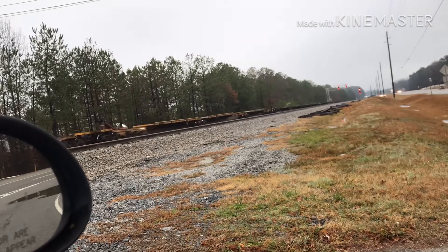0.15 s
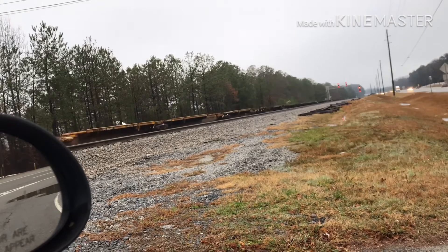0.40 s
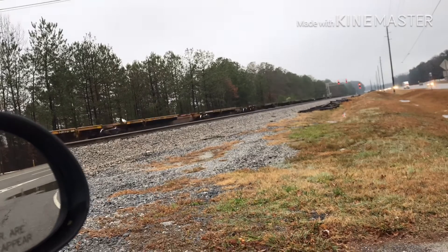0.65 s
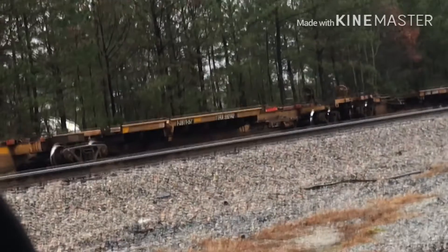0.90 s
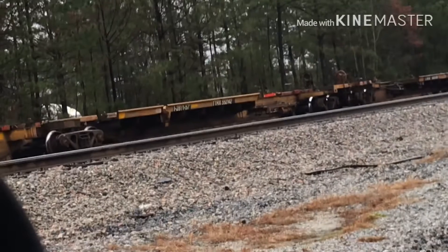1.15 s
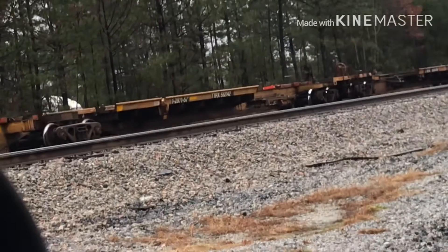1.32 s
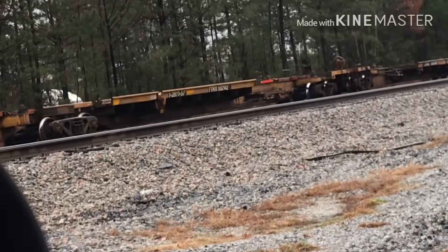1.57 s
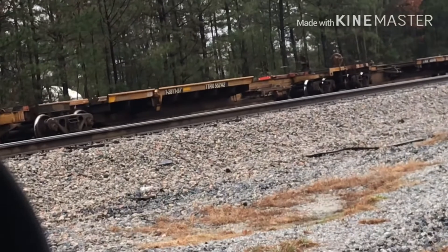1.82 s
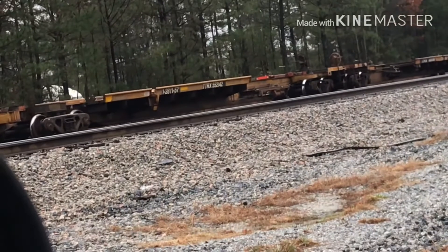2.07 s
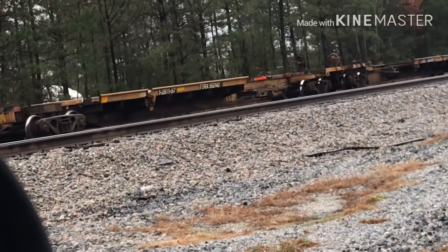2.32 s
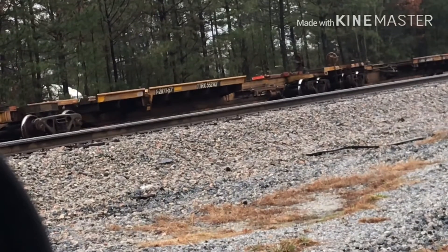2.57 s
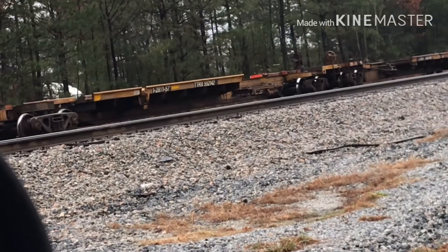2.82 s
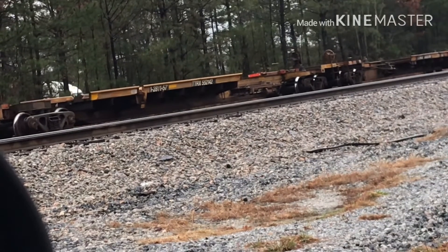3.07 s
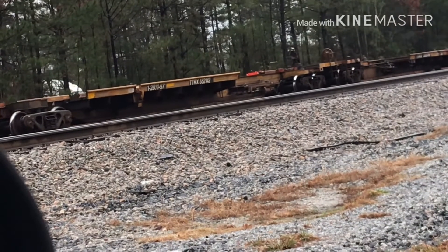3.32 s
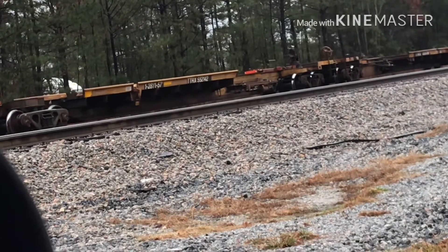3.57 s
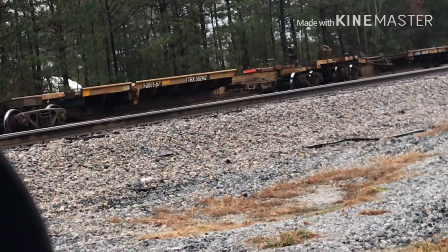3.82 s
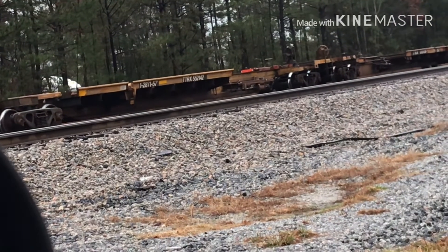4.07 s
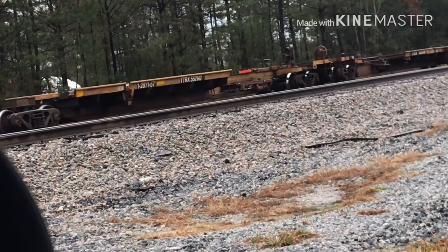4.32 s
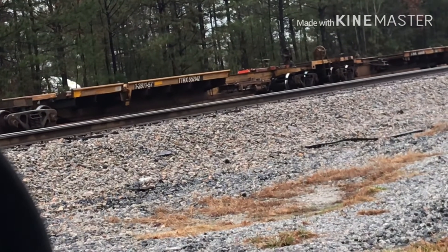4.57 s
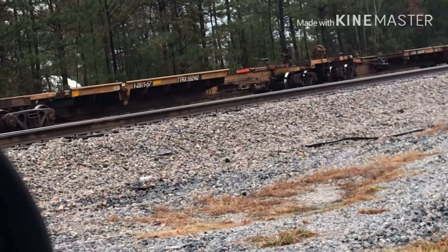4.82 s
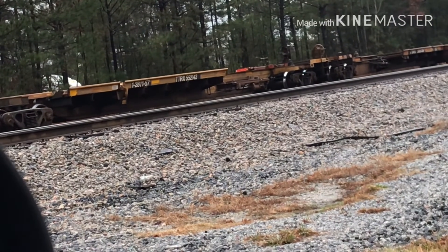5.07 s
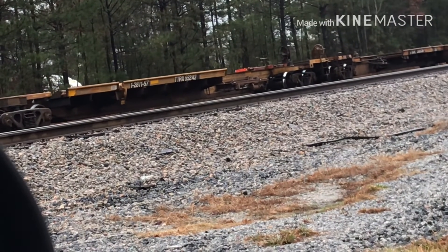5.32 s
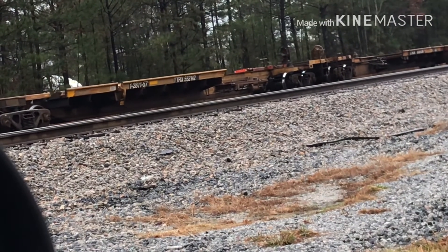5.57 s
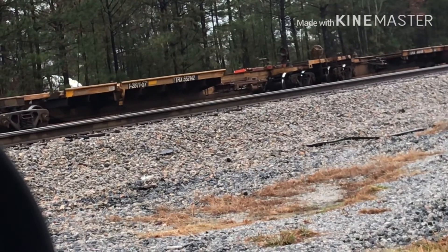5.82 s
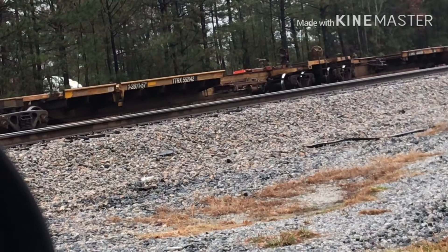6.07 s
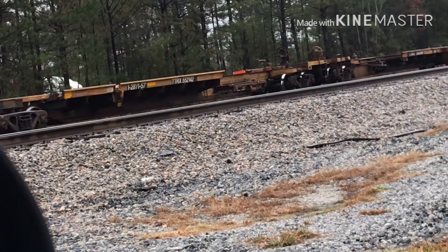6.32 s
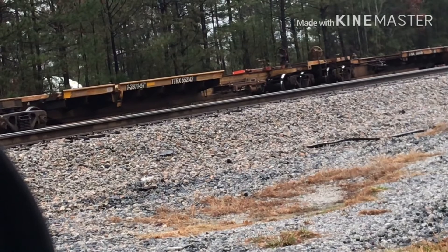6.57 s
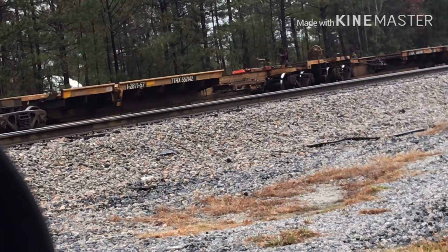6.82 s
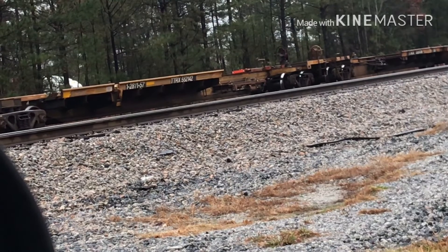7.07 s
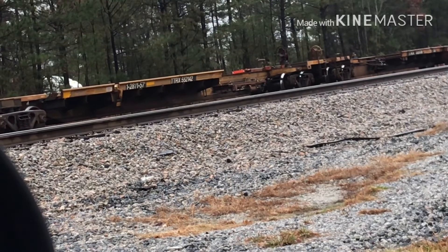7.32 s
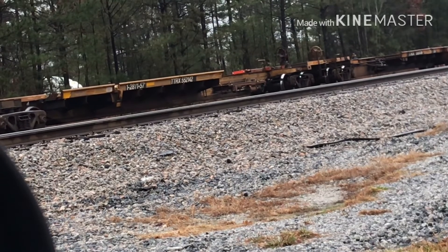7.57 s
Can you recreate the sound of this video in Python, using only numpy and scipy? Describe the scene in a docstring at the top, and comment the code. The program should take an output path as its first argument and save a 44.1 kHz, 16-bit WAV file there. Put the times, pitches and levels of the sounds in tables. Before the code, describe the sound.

After a short silence, wet-road traffic swells past a parked car over a slow, low engine throb, with one brief hollow creak.

```python
"""After a short silence, wet-road traffic swells in over a slow, low engine throb.
It is heard beside a railway line, from the open window of a parked car.
Traffic passes in swells: filtered noise makes rumble, tyre roar and spray; noise on gliding
pitches makes tyre singing; gliding sines make driveline hums; multiples of a firing rate make the throb.
Once something hollow creaks right by the microphone: stick-slip pulses ring a small body."""
import sys
import numpy as np
from scipy import signal
from scipy.fft import rfft, irfft, next_fast_len
from scipy.io import wavfile

SR = 44100
rng = np.random.default_rng(int(sys.argv[2]) if len(sys.argv) > 2 else 0)


def generate_wav(signal):
    """Clip the signal to [-1, 1] and save it as 16-bit WAV at the path in sys.argv[1]."""
    frames = np.transpose(np.atleast_2d(signal))
    scaled = np.clip(frames, -1, 1) * 32767
    pcm = np.round(scaled).astype(np.int16)
    wavfile.write(sys.argv[1], SR, pcm)


def rack_gain(trim_db):
    """Turn a fader trim in dB into the linear factor to multiply a signal by."""
    fader = np.asarray(trim_db, float)
    return 10 ** (fader / 20)


N = 337806   # length in samples


def rms_one(x):
    """Scales a signal to an rms of 1."""
    return x / np.sqrt(np.mean(x ** 2) + 1e-20)


def in_time(rows):
    """Draws straight lines through the table columns over time; the first column is t/s."""
    s, *columns = np.transpose(rows)
    return [np.interp(np.arange(N) / SR, s, c) for c in columns]


def at_hz(points, hz):
    """Reads a spectrum in dB along log frequency; beyond its ends it falls to -90 dB."""
    point_hz, point_db = np.transpose(points)
    return np.interp(np.log(hz), np.log(point_hz), point_db, left=-90, right=-90)


def drift(rate_hz):
    """Slow chance of spread 1: noise at every 40th sample through a double one-pole low-pass."""
    r = np.exp(-80 * np.pi * rate_hz / SR)
    noise = rng.standard_normal(N // 40 + 2002)
    slow = signal.lfilter([1], [1, -2 * r, r * r], noise)[2000:]   # the filter has settled by then
    return np.interp(np.arange(N) / 40, np.arange(len(slow)), rms_one(slow))


def resonance(x, hz, width_hz):
    """A two-pole resonance with a gain of about 1 at its peak."""
    r = np.exp(-np.pi * width_hz / SR)
    feedback = [1, -2 * r * np.cos(2 * np.pi * hz / SR), r * r]
    return signal.lfilter([(1 - r * r) / 2, 0, (r * r - 1) / 2], feedback, x)


# puddles hit by tyres: t/s, rise of mist level/dB, length/s between the 1/e points of the rise
PUDDLES = [(3.132, 3, 0.017), (4.8, 2, 0.03), (4.97, 3, 0.03), (5.058, 5, 0.037), (6.35, 6.5, 0.027),
           (6.418, 5.5, 0.055), (6.568, 4, 0.029), (6.98, 5, 0.039), (7.1, 4.5, 0.056), (7.228, 7.5, 0.042)]


def splash_rise_db():
    """Each puddle throws up a brief bell-shaped rise in level."""
    t = np.arange(N) / SR
    return sum(rise_db * np.exp(-((t - s) / (length_s / 2)) ** 2) for s, rise_db, length_s in PUDDLES)


# swells of passing traffic, one pass may take several rows: comes into view t/s, hidden by the car body
# t/s, tyre roar level/dB, rise while nearing/(dB/s) at steepness 1, body, spray and mist level/dB
# against the roar (each part takes its share), time constant of slipping out of view/s
TRAFFIC_SWELLS = [(0.732, 0.786, -30.5, 104, -6.5, 3, -3, 0.096),
                  (0.952, 1.378, -35.5, 21, 5.5, -4.5, -19.5, 0.098),
                  (3.163, 3.6, -55, 53, -14.5, -4, -38, .4),
                  (4.06, 4.195, -38.5, 9.5, -13.5, -10.5, -32, 0.33),
                  (4.53, 5.016, -33.5, 32, -3, -15, -25.5, 0.081),
                  (6.396, 6.76, -45, 40, -4, -3.5, -17, .15),
                  (6.903, 7.384, -39.5, 15, 1.5, -4.5, -23.5, 0.25),
                  (7.66, 7.996, -31.5, 6, -2.5, -12.5, -30, 0.11)]
# rows rumble, drone, roar, swish, spray, mist, haze: level/dB against roar, share of body, of spray,
# of mist, steepness of nearing, loss when hidden/dB, loss while leaving/(dB/s), far traffic level/dB
PART_MIX = [(-0.5, 1, 0.013, 0.17, 0.43, -1, 7, -44), (0.1, 0.98, 0.00049, 0.025, 0.74, 9.5, 6, -65),
            (-1.5, -0.5, 0.12, 0, 1.056, 7.5, 10.5, -50), (-4.5, -0.63, 0.66, 0.07, 2, 16.5, 8.5, -58.5),
            (0, -0.23, 0.99, 0.018, 1.63, 13.5, 19.5, -57.5),
            (0, 0.047, 0.021, 0.94, 1.37, 18, 19.5, -77.5), (-6.5, 0.048, 0, 1.47, 1.9, 12.5, 28.5, -91.5)]


def part_powers():
    """Each swell of passing traffic rises, sags in view, drops when hidden and fades; powers add."""
    t = np.arange(N) / SR
    sag_db_per_s = 5   # slow loss while in view, at steepness 1
    (offset_db, body_share, spray_share, mist_share,
     steep, hidden_db, leave_db, far_db) = np.transpose(PART_MIX)[:, :, None]
    powers = rack_gain(2 * far_db) * np.ones(N)
    for seen, hidden, roar_db, rise_db, body_db, spray_db, mist_db, hiding_s in TRAFFIC_SWELLS:
        early, late = np.maximum(seen - t, 0), np.maximum(t - hidden, 0)
        in_view = np.clip(t - seen, 0, hidden - seen)
        loss_db = steep * (rise_db * early + sag_db_per_s * in_view)
        loss_db = loss_db + hidden_db * (1 - np.exp(-(late / hiding_s) ** 2)) + leave_db * late
        colour_db = offset_db + body_share * body_db + spray_share * spray_db + mist_share * mist_db
        powers += rack_gain(2 * (roar_db + colour_db - loss_db))
    splash_db = splash_rise_db()
    for part, share in [(3, 0.25), (4, 0.91), (5, 1)]:   # swish, spray, mist
        powers[part] *= rack_gain(2 * share * splash_db)
    return powers


# noise colours of the traffic parts, low to high: f/Hz, relative level/dB per Hz
RUMBLE_COLOUR = [(35, -44), (50, -9.5), (120, -2), (300, -2.5), (450, -8.5), (800, -18)]
DRONE_COLOUR = [(250, -32), (420, -3.5), (650, -5.5), (950, -6), (1500, -6)]
ROAR_COLOUR = [(600, -16.5), (1000, 2), (1600, -0.5), (2400, -6), (3500, -17.5), (5000, -48)]
SWISH_COLOUR = [(1800, -14), (2700, 1), (3300, -2), (4200, -2.5), (5200, -36)]
SPRAY_COLOUR = [(3500, -4.5), (4600, -2), (6000, 2), (6900, -4), (7600, -14.5), (9500, -36)]
MIST_COLOUR = [(5500, -9.5), (7500, -1), (9300, -14), (11000, -15), (14500, -28), (17000, -37.5)]
HAZE_COLOUR = [(9500, -25), (11000, -5), (14500, -2), (17000, -5)]


def traffic(shared_db=0.62, patchy_db=0.93, slow_db=1.3):
    """Narrow noise bands; in each the powers of all parts add, and the sum flickers."""
    size = next_fast_len(N)
    hz = np.maximum(np.arange(size // 2 + 1) * SR / size, 1)
    colours = [RUMBLE_COLOUR, DRONE_COLOUR, ROAR_COLOUR, SWISH_COLOUR,
               SPRAY_COLOUR, MIST_COLOUR, HAZE_COLOUR]
    totals = [np.sum(rack_gain(at_hz(c, hz)) ** 2) for c in colours]   # for power 1 per part
    powers = part_powers()
    white = rfft(rng.standard_normal(size)) * np.sqrt(size / 2)   # power 1 per frequency bin
    out, together = np.zeros(N), drift(16.0)
    for centre in 2 ** np.arange(5, 14.1, 1 / 6):   # f/Hz, a sixth of an octave apart
        steps = np.clip(np.log2(hz / centre) * 6, -1, 1)
        overlap = np.cos(np.pi / 2 * steps) ** 2   # neighbouring bands sum to 1
        band = irfft(white * overlap, size)[:N]
        shares = np.array([rack_gain(2 * at_hz(c, centre)) for c in colours]) / totals
        flicker_db = shared_db * together + patchy_db * drift(8.7) + slow_db * drift(1.84)
        out += band * np.sqrt(shares @ powers) * rack_gain(flicker_db)
    return out


# echo off the road beside the direct sound: t/s, lag/ms, strength (0-1)
ROAD_REFLECTION = [(.63, 0.55, 0.41), (1.5, 0.57, 0.06), (3.2, 0.46, 0.12), (3.8, 0.5, 0.44),
                   (4.5, 0.58, 0.4), (5.3, 0.59, 0.01), (7.66, 0.56, 0.33)]


def road_echo(x, dull_hz=3600):
    """A late, duller copy combs the sound; its dips glide as the vehicle moves."""
    lag_ms, strength = in_time(ROAD_REFLECTION)
    dull = signal.sosfiltfilt(signal.butter(2, dull_hz, fs=SR, output="sos"), x)
    late = np.interp(np.arange(N) - lag_ms * SR / 1000, np.arange(N), dull)
    return (x + strength * late) / np.sqrt(1 + strength ** 2)


# broad tyre singing, mostly sinking as they pass: start t/s, end t/s, start f/Hz, end f/Hz,
# width f/Hz, level/dB
TYRE_SINGING = [(3.85, 4.68, 3750, 2900, 520, -44), (4.42, 4.88, 1650, 1300, 720, -34.5),
                (3.45, 4.3, 6200, 5750, 500, -52.5), (4.42, 5.3, 1120, 1060, 190, -40),
                (3.4, 5.2, 7700, 8350, 350, -67), (6.85, 7.35, 3760, 3700, 130, -51),
                (.75, 1.45, 670, 610, 170, -40.5), (.66, .95, 1700, 1500, 370, -39),
                (7.2, 8.1, 1800, 1650, 890, -40), (4.6, 5.15, 3800, 3700, 370, -53),
                (4.6, 5.15, 5400, 5700, 1670, -47.5), (6.78, 7.3, 5950, 5750, 450, -50),
                (6.78, 7.18, 4800, 4650, 320, -48.5)]


def singing():
    """Narrow noise carried on a gliding pitch, swelling and fading."""
    t, out = np.arange(N) / SR, np.zeros(N)
    for start, end, start_hz, end_hz, width_hz, level_db in TYRE_SINGING:
        along = np.clip((t - start) / (end - start), 0, 1)
        phase = 2 * np.pi * np.cumsum(start_hz + (end_hz - start_hz) * along) / SR
        low_pass = signal.butter(2, width_hz / 2, fs=SR, output="sos")
        a, b = signal.sosfilt(low_pass, rng.standard_normal((2, N)))
        tone = rms_one(a * np.sin(phase) + b * np.cos(phase))
        swell = np.abs(np.sin(np.pi * along)) ** 0.55   # smaller exponent = more sudden
        out += rack_gain(level_db) * swell * tone
    return out


# fixed peaks and dips in the tone of the road sound: f/Hz, width f/Hz, level/dB
ROAD_TONE = [(443.6, 44, -5.5), (640, 128, 3), (948, 108, -5), (1326, 423, -7.5), (2603, 100, -8.5),
             (3710, 62, 4.5), (4315, 290, -5.5), (4870, 120, 3), (5820, 340, 2.5), (7710, 840, -5),
             (9260, 380, 5.5)]


def road_tone(x):
    """Resonances added or taken away set fixed peaks and dips in the tone of the road sound."""
    for hz, width_hz, gain_db in ROAD_TONE:
        x = x + (rack_gain(gain_db) - 1) * resonance(x, hz, width_hz)
    return x


# hums of passing drivelines: start t/s, end t/s, start f/Hz, end f/Hz, peak level/dB before wavering
DRIVELINE_HUMS = [(0.899, 2.689, 322, 301, -40), (5.395, 6.297, 167.2, 168.9, -43),
                  (6.705, 7.05, 233.2, 227.6, -37.5)]


def hums():
    """Driveline hums: sines that swell and fade on a gliding pitch, wavering in level and timing."""
    t, out = np.arange(N) / SR, np.zeros(N)
    for start, end, start_hz, end_hz, level_db in DRIVELINE_HUMS:
        along = np.clip((t - start) / (end - start), 0, 1)
        turns = np.cumsum(start_hz + (end_hz - start_hz) * along) / SR + 0.081 * drift(9.6)
        swell = np.sin(np.pi * along) ** 0.35
        out += rack_gain(level_db + 2.4 * drift(4.0)) * swell * np.sin(2 * np.pi * turns)
    return out


# creak: t/s, slip rate f/Hz, drive level/dB
CREAK_SLIPS = [(2.077, 850, -16), (2.079, 820, -10), (2.0828, 810, -5), (2.0842, 580, 0), (2.0862, 730, -4),
               (2.0915, 750, -5), (2.093, 580, -1), (2.0952, 720, 2.5), (2.0972, 700, -18),
               (2.106, 650, -26)]
# hollow body, each resonance passed twice: f/Hz, width f/Hz per pass, level/dB
HOLLOW_BODY = [(560, 303, -0.5), (706, 450, 0.5), (917, 170, -5), (1460, 170, -11), (2260, 210, -12.5),
               (3550, 230, -23)]


def creak(rough=0.58, soft_hz=3700):
    """Fast stick-slip pulses of a soft contact, some noise between them, ring a small hollow body."""
    rate_hz, level_db = in_time(CREAK_SLIPS)
    t = np.arange(N) / SR
    started, unfinished = t > CREAK_SLIPS[0][0], t < CREAK_SLIPS[-1][0]
    turns = np.cumsum(rate_hz * started) / SR
    slips = np.diff(np.floor(turns + .5), prepend=0) > 0
    drive = rms_one(1. * slips) + rough * rng.standard_normal(N)
    drive = drive * rack_gain(level_db) * started * unfinished + 1e-18
    drive = signal.sosfilt(signal.butter(6, soft_hz, fs=SR, output="sos"), drive)
    return sum(rack_gain(db) * resonance(resonance(drive, hz, width_hz), hz, width_hz)
               for hz, width_hz, db in HOLLOW_BODY)


# slow engine: t/s, firing rate f/Hz, level/dB of its 2nd, 3rd and 4th multiple before wavering
ENGINE_THROB = [(0.7, 29.62, -50, -40.5, -37.5), (1.25, 28.93, -44, -39, -36),
                (1.65, 28.4, -43, -41.5, -42.5), (2.0, 27.55, -40, -40, -32), (2.5, 26.89, -45.5, -39, -31),
                (2.8, 26.9, -39.5, -41.5, -36.5), (3.3, 26.97, -61, -40, -39),
                (3.7, 26.97, -44.5, -44, -44), (4.4, 26.92, -49, -40.5, -43), (4.89, 26.8, -41, -40.5, -46),
                (5.5, 27.06, -43, -40.5, -47.5), (6.2, 27.12, -43.5, -43.5, -58),
                (6.95, 26.97, -48, -45, -58), (7.5, 26.6, -51, -41, -50)]


def engine():
    """Low multiples of the firing rate form a throb, uneven between firings; shake noise throbs along."""
    fifth_db, shake_db = -8.5, -4   # against the 3rd multiple
    waver_db, firing_spread_db = 2, 1.5
    waver_turns, loose_turns = 0.017, 0.064   # unsteady timing; slip of multiples against each other
    firing_hz, second_db, third_db, fourth_db = in_time(ENGINE_THROB)
    turns = np.cumsum(firing_hz) / SR + rng.random() + waver_turns * drift(3.7)
    strengths_db = firing_spread_db * rng.standard_normal(int(turns[-1]) + 3)
    shake_band = signal.butter(2, [48.0, 125.0], "band", fs=SR, output="sos")
    shake = signal.sosfilt(shake_band, rng.standard_normal(N))
    throbbing_shake = rms_one(shake * (1 + 1.7 * np.cos(2 * np.pi * turns)))
    out = rack_gain(third_db + shake_db) * throbbing_shake
    for multiple, level_db in enumerate([second_db, third_db, fourth_db, third_db + fifth_db], start=2):
        phase = multiple * turns + loose_turns * drift(3.3)
        level = np.sqrt(2) * rack_gain(level_db + waver_db * drift(18.0))
        out += level * np.sin(2 * np.pi * phase)
    return out * rack_gain(np.interp(turns, np.arange(len(strengths_db)), strengths_db))


def microphone_hiss():
    """Steady white noise of the microphone at -76 dB."""
    return rack_gain(-76) * rng.standard_normal(N)


def fade_in():
    """Silence, then an even swell that begins at a small share of full level."""
    start_s, first_share, full_rise_s = .628, 0.11, 0.16   # full_rise_s: slope, as time from 0 to 1
    since = np.arange(N) / SR - start_s
    return np.clip(first_share + since / full_rise_s, 0, 1) * (since > 0)


def scene():
    """Traffic and tyre singing take on the road tone; engine, hums, creak and hiss join untouched."""
    road = road_tone(road_echo(traffic()) + singing())
    mix = road + hums() + engine() + creak() + microphone_hiss()
    return (mix * fade_in())[None]


def band_limit(x):
    """A steep low-pass at the top of the band."""
    return signal.sosfilt(signal.butter(12, 15890, fs=SR, output="sos"), x)


def record(dry):
    """Removes the deepest bass and everything above about 15.9 kHz."""
    x = signal.sosfilt(signal.butter(4, 46.0, "high", fs=SR, output="sos"), dry)
    x = signal.sosfilt(signal.cheby2(12, 60, 15900, fs=SR, output="sos"), x)
    return band_limit(x)


dry = scene()
out = record(dry)
generate_wav(out)
```